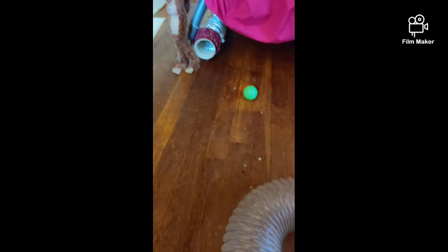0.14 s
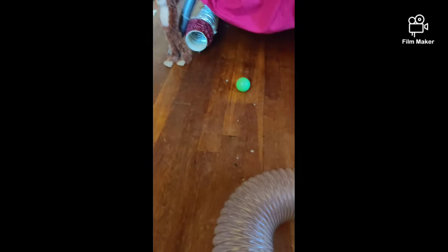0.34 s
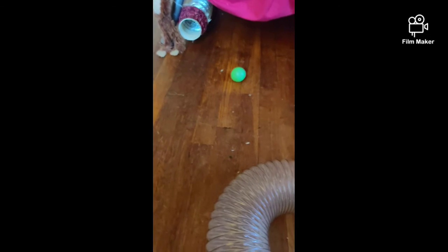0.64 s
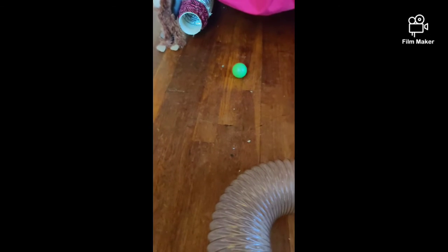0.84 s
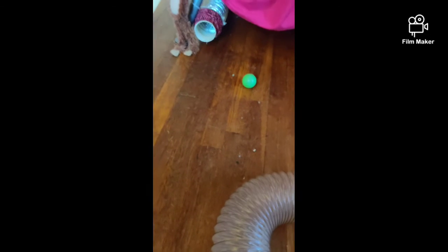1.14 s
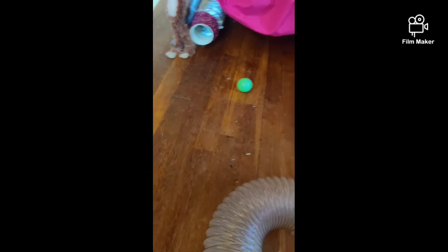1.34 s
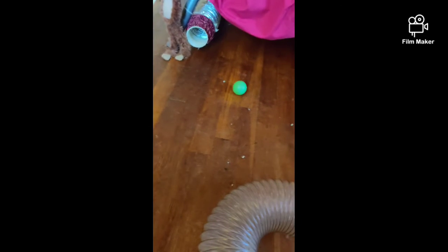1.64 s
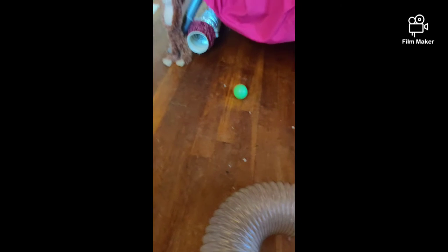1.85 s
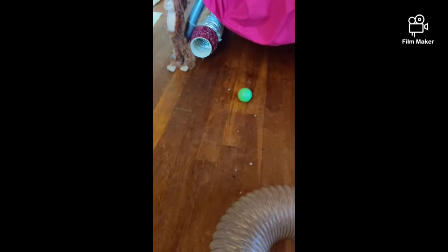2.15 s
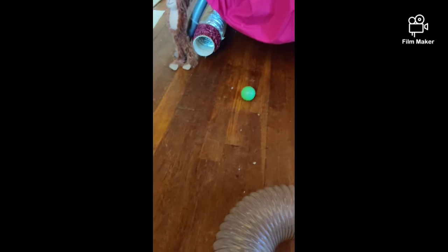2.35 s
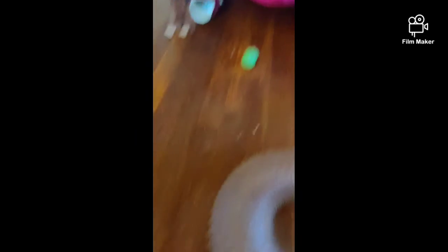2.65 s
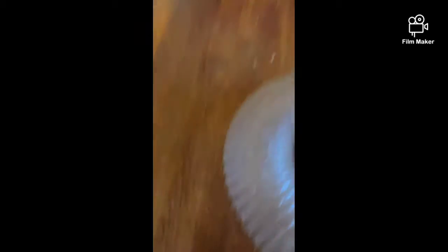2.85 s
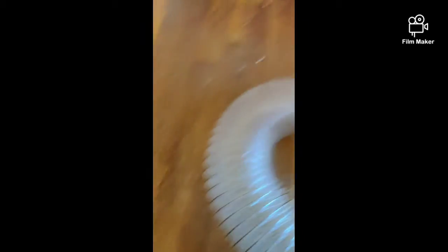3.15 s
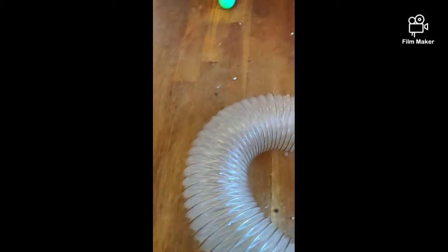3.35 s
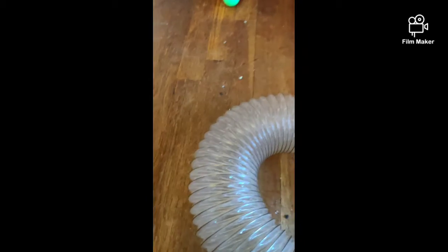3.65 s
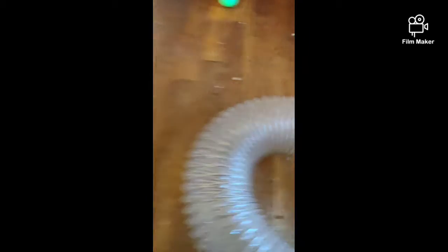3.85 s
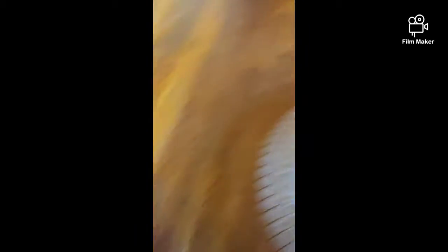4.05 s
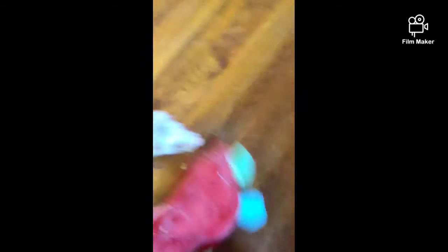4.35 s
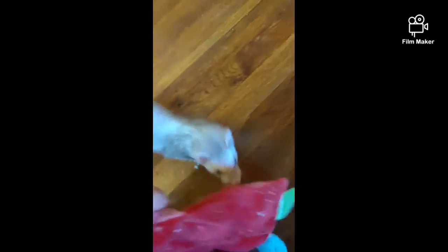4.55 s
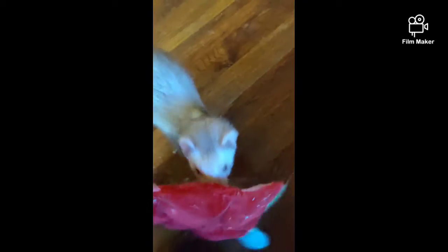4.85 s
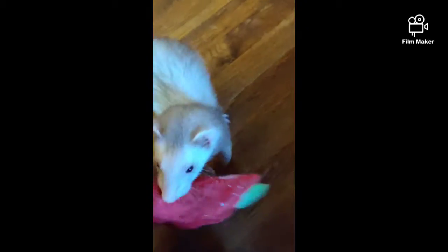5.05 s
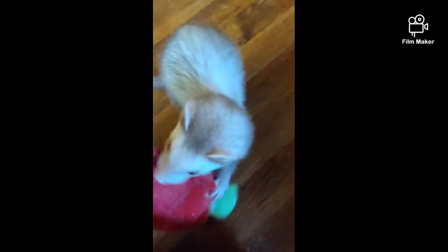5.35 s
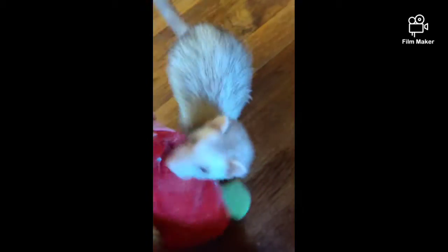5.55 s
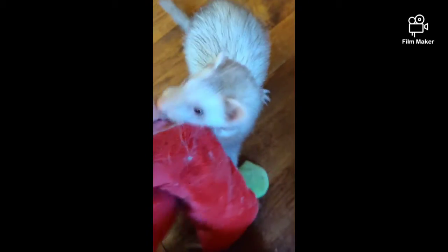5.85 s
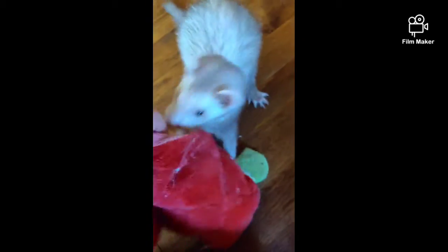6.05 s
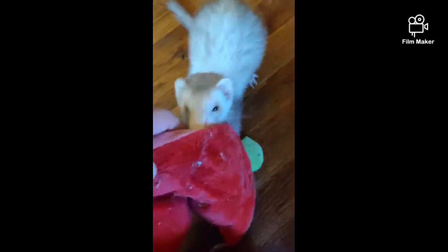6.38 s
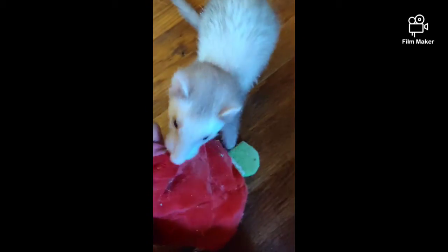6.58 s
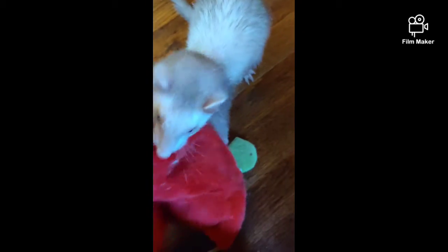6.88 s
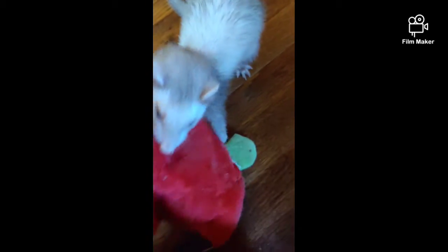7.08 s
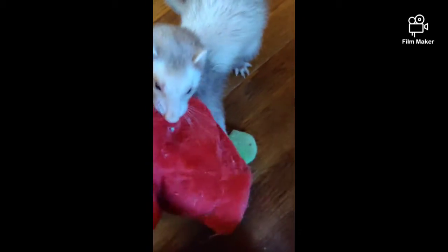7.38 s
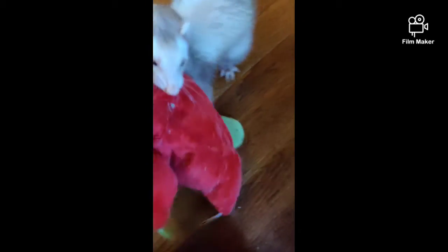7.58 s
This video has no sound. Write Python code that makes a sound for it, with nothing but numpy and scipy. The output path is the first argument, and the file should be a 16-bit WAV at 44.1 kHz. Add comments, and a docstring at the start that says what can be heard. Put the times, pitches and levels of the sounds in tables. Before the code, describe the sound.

Rapid, loud, nasal squeaks alternate high and slightly lower, about six a second, from a squeezed toy near the microphone. A one-second gap holds quiet room air, a soft low thump of handling and a few dull taps. The squeaks then return a little slower, short room reflections trailing them, while brushed fabric and soft, breathy ferret clucks lie far beneath. The squeaking carries on right to the end.

```python
"""Bright squeaks alternate with lower, duller ones: a hand pumps a squeaky plush toy close to a hand-held phone.
Each squeeze blows air out through a pulsing reed; each release sucks it back; body, hand and floor colour both.
A small room adds a decaying noise tail; under it lie filtered-noise room air, far bass and hand rumble.
Noise makes small taps and plush rustle; later a ferret clucks softly in short sagging two-harmonic tones."""
import sys
import numpy as np
from scipy import signal
from scipy.fft import rfft, irfft, next_fast_len
from scipy.io import wavfile
from scipy.ndimage import uniform_filter1d, map_coordinates

SR = 44100
rng = np.random.default_rng(int(sys.argv[2]) if len(sys.argv) > 2 else 0)


def digitize_waveform(pressure):
    """Quantize a signal to 16-bit integers and store it at the path in sys.argv[1].

    Rows of a 2-D input are taken as channels; values are limited to [-1, 1].
    """
    field = np.atleast_2d(pressure).T
    bounded = np.clip(field, -1, 1)
    quanta = np.round(bounded * 32767).astype(np.int16)
    wavfile.write(sys.argv[1], SR, quanta)


def how_loud(loudness_db):
    """Turn decibels into a plain amplitude multiplier (0 dB gives 1, 20 dB gives 10)."""
    steps = np.asarray(loudness_db, float) / 20
    return 10 ** steps


N = 340452
LEAD = SR // 4  # samples kept before the first moment
START = .008  # s into each squeak's sound at which the reed starts to swing

# Squeezes: start_s, length_s, middle_reed_hz, level_db, treble_tilt_db_per_octave
SQUEEZES = [(-0.115, 0.046, 1165, -11, -1.5), (0.254, .075, 1201, -9.5, 0.96),
            (.579, 0.065, 1188, -11, 1.4), (.911, 0.076, 1227, -10.5, 0.5),
            (1.2123, 0.058, 1162, -9.5, 1.8), (1.5082, .073, 1148, -10, 2.3), (1.813, .069, 1144, -9.5, 3),
            (2.141, 0.08, 1176, -9.5, 1.5), (2.465, .068, 1166, -9.5, 1.95), (2.745, .06, 1182, -10, 1.6),
            (4.0038, 0.075, 1224, -10, 0.5), (4.3906, .067, 1222, -9.5, 1.56),
            (4.7392, 0.075, 1197, -14, 0), (5.1023, 0.069, 1221, -10, 2), (5.439, 0.064, 1205, -10, 1.66),
            (5.7839, 0.065, 1218, -10, -0.5), (6.1806, 0.069, 1215, -10, -0.75),
            (6.6371, 0.079, 1192, -9.5, 0.3), (7.0594, .079, 1184, -8, -0.54),
            (7.477, 0.082, 1128, -9, -0.8)]
# Releases: start_s, length_s, highest_reed_hz (nominal), level_db, treble_tilt_db_per_octave
RELEASES = [(0.06, 0.095, 919, -15, 2), (0.4203, 0.089, 923, -13.5, 1.3), (0.7278, 0.088, 951, -14.5, 1.1),
            (1.0691, 0.081, 926.5, -14, 2), (1.3512, 0.076, 961, -13, 2.5),
            (1.6557, 0.075, 953.3, -13.5, 2), (1.9739, 0.086, 954, -13.5, 2), (2.316, .08, 919, -14.5, 2.2),
            (2.6308, 0.065, 923, -14.5, 2.1), (2.9164, 0.089, 903.5, -15, 0.6),
            (4.2004, 0.085, 917.6, -14.5, 1), (4.5602, 0.087, 926, -13, 0.9),
            (4.901, 0.091, 928.7, -13, 1.5), (5.2686, 0.076, 912.6, -13.5, 1.5),
            (5.6, 0.075, 906, -15, 0.4), (5.9565, 0.087, 926.3, -12, 0.5),
            (6.3637, 0.11, 932.6, -12.5, 1.5), (6.837, 0.099, 913, -13, 0.54),
            (7.252, 0.087, 911, -11, 0.1), (7.6837, 0.053, 910, -13, 0)]
# Moments in a squeak: share_of_length
STAGES = (0, .2, .5, .78, 1)
# Course at the STAGES: usual_reed_hz, share of this squeak's pitch offset that shows, level_db
SQUEEZE_COURSE = [(1086.5, .1, 1), (1144, 0.34, 0), (1184.9, 1, -0.16), (1116.3, 0.79, -2.5),
                  (1023.7, 0.36, -10)]
RELEASE_COURSE = [(894, 0.69, -1), (923, 0.78, -0.5), (910.4, .8, 0.3), (884.2, 0.35, -3.5),
                  (842.4, 0.12, -7)]
# Squeaker body, one gain per harmonic before the treble tilt: level_db
SQUEEZE_HARMONICS = [-3.5, -2.5, -6.5, -0.04, -4.5, -0.43, -2.45, -14.5, -14.5, -18.5, -14.5, -16.5]
RELEASE_HARMONICS = [1.5, -1.7, -1.24, -9.5, -6, -9, -24.5, -4, -8, -12.5, -20, -16.5, -30, -21.5, -19.5,
                     -24.5]
# How early the hand's pressure peaks: time_s, share_of_squeak
HURRY = [(0, 0), (.6, 0.11), (1.0, -0.023), (1.3, 0.13), (2.0, 0.14), (2.4, 0.019), (4, -.05), (6, -0.044),
         (7.7, 0.028)]
# Where the toy is held: time_s, left_lag_ms, squeeze_left_over_right_db, release_left_over_right_db
PLACE = [(0, 0.28, -3, -4.5), (1.2, 0.25, 0, -2), (2.2, 0.26, -2.4, -3.5), (4.0, 0.27, -3, -2),
         (4.4, 0.031, -2, -3.5), (5.15, -0.0058, -4.5, -0.5), (5.7, -0.11, -6, -0.5),
         (6.0, -0.082, -2.9, -2.5), (7.7, -0.064, -4, -5)]
# The left port over the right: frequency_hz, level_db
PORTS = [(900, 0.6), (2000, 5.5), (2800, 0), (4500, 1.4), (6000, 0), (7500, -3), (9500, 2.5), (12000, 1.5),
         (15000, -1.5)]
# Bounce off the closing or opening hand: time_s, left_delay_ms, right_delay_ms, strength (0-1)
SQUEEZE_BOUNCE = [(.25, .45, 0.357, 0.3), (.7, .3, .18, .32), (1.2, 0.15, 0.058, 0.33),
                  (1.85, 0.13, 0.065, 0.4), (2.3, 0.1, .21, 0.39), (4.1, 0.12, .25, 0),
                  (4.6, .3, 0.14, 0.6), (5.8, 0.11, 0.095, 0.1), (6.2, .4, .28, 0.2), (6.65, .4, .13, 0.2),
                  (7.05, 0.3, .1, 0.51), (7.5, 0.29, 0.13, 0.29)]
RELEASE_BOUNCE = [(.4, 0.087, .15, 0.34), (.73, .45, .2, .35), (1.07, .06, .15, .46), (1.35, .45, .17, 0.3),
                  (2.0, .45, .17, 0.35), (2.3, 0.074, .16, 0.48), (4.4, .1, 0.16, .5),
                  (5.5, 0.095, 0.13, 0.33), (5.95, 0.1, 0.29, 0.26), (7.7, 0.055, 0.286, 0.32)]
# Hollow between hand and plush, coloured towards the right port: time_s, level_db
HOLLOW = [(5.8, 2), (6.4, -4), (6.9, 8), (7.7, 8)]
# Room decay: frequency_hz, t60_s
ROOM_DECAY = [(500, 0.3), (2000, 0.32), (6000, 0.37), (15000, 0.28)]
# Room share, less as the toy comes nearer: time_s, level_db
ROOM_SHARE = [(0, -9.5), (3, -10), (4, -9.5), (5.5, -12), (7.7, -14.5)]
# Hand rumble before its unsteadiness and port balance: time_s, level_db
HANDLING = [(0.1, -43), (2.31, -41.5), (2.9, -36.5), (3.15, -26.5), (3.38, -42), (7.6, -42)]
# Rumble spectrum: frequency_hz, level_db per Hz
RUMBLE = [(2, -17), (6, 0.5), (15, -1), (30, -22.5), (60, -24), (120, -69)]
# Quiet room spectrum: frequency_hz, level_db per Hz
AIR = [(50, -25), (90, -6.5), (200, -17), (400, -15), (1000, -23.5), (3000, -28.5), (8000, -35),
       (15800, -49)]
# Far bass spectrum: frequency_hz, level_db per Hz
FAR_BASS = [(60, -18.5), (120, -3.5), (250, -4.0), (600, -32.5)]
# Plush rustle before its flutter: time_s, level_db
RUSTLE = [(3.0, -64.5), (3.4, -69.5), (3.75, -82.5), (3.95, -61), (5.3, -55.5), (5.9, -52.5), (6.04, -38),
          (6.16, -38.5), (6.3, -53), (6.52, -43), (6.75, -53), (7.05, -45), (7.45, -59.5), (7.6, -62.5)]
# Plush spectrum: frequency_hz, level_db per Hz
PLUSH = [(100, -22), (200, -3), (500, 0), (1300, -7), (4600, -7), (10000, -8), (15800, -10)]
# Small taps: start_s, level_db before a 1 dB lift, treble_db against the dull part
TAPS = [(3.089, -47, -18), (3.317, -53.5, -19), (3.528, -72, -14.5), (3.949, -58.5, -7)]
# Ferret clucks: start_s, level_db before a 3.5 dB trim and wobble, throat_hz before it sags
CLUCKS = [(5.423, -45, 366), (5.668, -37, 237.6), (6.007, -38.5, 427), (6.425, -45, 387),
          (6.502, -44.5, 312), (6.911, -46.5, 432), (7.038, -43, 226), (7.206, -37, 304.6),
          (7.307, -37, 387), (7.411, -39, 309), (7.509, -38.5, 334), (7.672, -42, 231)]


def unit(x):
    """Scale a sound to rms 1."""
    return x / np.sqrt(np.mean(x ** 2) + 1e-20)


def along(points, hz):
    """Read (frequency_hz, value) points on a log axis."""
    f, v = np.transpose(points)
    return np.interp(np.log(hz + 1), np.log(f + 1), v)


def at(rows, s):
    """The columns after the time, read at s seconds."""
    times, *cols = np.transpose(rows)
    return [np.interp(s, times, c) for c in cols]


def curves(rows):
    """One value per sample for each column after the time."""
    return at(rows, np.arange(N) / SR)


def wobble(rate, n=N):
    """A smooth random curve, rate knots a second."""
    return map_coordinates(rng.standard_normal(int(n * rate / SR) + 4), [np.arange(n) * rate / SR])


def noise(spectrum, channels):
    """Coloured noise of rms 1."""
    m = next_fast_len(N)
    gain = how_loud(along(spectrum, np.fft.rfftfreq(m, 1 / SR)))
    white = rng.standard_normal((channels, m))
    return unit(irfft(rfft(white) * gain, m)[:, :N])


def causal(gain):
    """The minimum-phase response with this gain."""
    c = irfft(np.log(gain))
    half = len(c) // 2
    c[1:half] *= 2
    c[half + 1:] = 0
    return np.exp(rfft(c))


def add(track, sound, s):
    """Mix a sound in at s seconds; the track starts LEAD samples early."""
    part = track[..., round(s * SR) + LEAD:][..., :sound.shape[-1]]
    part += sound[..., :part.shape[-1]]


def reed(length, early, hz, db, rise, fall, scoop, droop, jitter, breath, soften=0.15):
    """One pulse per reed closure plus gated air noise: steady, then shaped by swing and hand pressure."""
    share = np.array(STAGES)
    s = length * (share - 2 * early * share * (1 - share))
    t = np.arange(round((length + .05) * SR)) / SR - START
    after = np.maximum(t - length, 0)
    # the reed swings up, and dies when the air runs out
    swing = np.exp(-after / fall) / (1 + np.exp(-t / rise))
    pitch = uniform_filter1d(np.interp(t, s, hz), size=600)
    pitch = pitch * np.exp(-droop * after) * (1 - scoop / (1 + np.exp(t / rise)))
    phase = 2 * np.pi * np.cumsum(pitch * (1 + jitter * wobble(400, len(t)))) / SR
    k = np.arange(1, int(16500 / max(hz)) + 1)[:, None]  # harmonic numbers
    harmonics = np.cos(k * phase)
    hiss = breath * (1 + np.cos(phase)) * np.diff(rng.standard_normal(len(t) + 1))
    soft = swing ** (1 + soften * (k - 1))  # a small swing closes gently: few overtones
    steady = harmonics.sum(0) + hiss
    shaped = how_loud(np.interp(t, s, db)) * ((soft * harmonics).sum(0) + swing * hiss)
    return steady, shaped


def path_to_ports(hz, s, lag_ms, pan_db, bounces):
    """Travel to the two ports: level and lag between them, a hand bounce, floor echoes and the hollow."""
    def late(ms):
        return np.exp(-2j * np.pi * hz * ms / 1000)

    side = np.array([[.5], [-.5]])
    *delays, strength = at(bounces, s)
    path = how_loud(side * (pan_db + along(PORTS, hz))) * late(1 + side * lag_ms)
    path = path * (1 + strength * late(np.c_[delays]))
    # three treble echoes off boards and toys: scattered around 4.5 ms, low edge 5550 Hz
    echoes = sum(late(ms) for ms in 4.5 * rng.uniform(0.55, 1.4, (3, 2, 1)))
    path = path * (1 + how_loud(-10.5) * echoes / (1 + (5550 / (hz + 1)) ** 4))
    path[1] *= how_loud(at(HOLLOW, s)[0] * np.exp(-((hz - 2750) / 500) ** 2))
    return path


def squeaks(rows, course, usual_hz, harmonics_db, body_hz, bounces, flow, pan_column, **reed_settings):
    """Drive the squeaker's body with the reed and carry each squeak to both ports."""
    size = 8192
    near, hz = np.zeros((2, N + SR)), np.fft.rfftfreq(size, 1 / SR)
    small = 1 / (1 + (550 / (hz + 1)) ** 6)  # so small a squeaker radiates no bass
    course_hz, shows, course_db = np.transpose(course)
    body_db = np.interp(hz, body_hz * np.arange(1, len(harmonics_db) + 1), harmonics_db)
    for s, length, squeak_hz, level_db, tilt_db in rows:
        reed_hz = course_hz + shows * (squeak_hz - usual_hz)
        steady, shaped = reed(length, at(HURRY, s)[0], reed_hz, level_db + course_db, **reed_settings)
        tilt = tilt_db * np.log2(np.maximum(hz, 500) / 3000)
        body = flow * small * causal(how_loud(body_db + tilt))
        place = at(PLACE, s)
        path = path_to_ports(hz, s, place[0], place[pan_column], bounces)
        steady_out, sound = irfft(rfft([[steady], [shaped]], size) * body * path)
        # the steady reed sets the loudness, so the pressure course stays audible
        add(near, sound / np.std(steady_out[:, :len(shaped)]), s - START - .0015)
    return near


def squeezes():
    """Air runs out through the reed: high and bright, with a quick swing and more breath."""
    return squeaks(SQUEEZES, SQUEEZE_COURSE, 1185, SQUEEZE_HARMONICS, 1179.5, SQUEEZE_BOUNCE,
                   flow=-1j, pan_column=1,
                   rise=.00055, fall=.006,  # s
                   scoop=.1, droop=5.6,  # share of pitch at the onset; share per s as the air runs out
                   jitter=.0015, breath=.085)


def releases():
    """Air is sucked back, so the pressure steps the other way: lower and duller, with a slower swing."""
    return squeaks(RELEASES, RELEASE_COURSE, 923, RELEASE_HARMONICS, 923.4, RELEASE_BOUNCE,
                   flow=1j, pan_column=2,
                   rise=.001, fall=0.0067,  # s
                   scoop=.17, droop=13,  # share of pitch at the onset; share per s as the air runs out
                   jitter=.0008, breath=.03)


def room(x, block=SR // 6):
    """The walls' answer; hand and phone move, so every squeak or so gets a new tail of decaying noise."""
    out = np.zeros_like(x)
    for start in range(0, N + LEAD, block):
        hz, t, z = signal.stft(rng.standard_normal((2, SR // 2)), SR, nperseg=256)
        decay = how_loud(-60 * t / along(ROOM_DECAY, hz)[:, None])
        tail = signal.istft(z * decay, SR, nperseg=256)[1]
        tail = tail / np.linalg.norm(tail[0])
        # each side answers the opposite one
        answer = signal.fftconvolve(x[::-1, start:start + block], tail, axes=1)
        add(out, answer, (start - LEAD) / SR + .004)
    return out


def hand_rumble():
    """Slow low noise from the holding hand, which sits by the right port."""
    level_db = curves(HANDLING)[0] + np.c_[[-9, 4]] + 5.1 * wobble(6.7)
    return how_loud(level_db) * unit(0.55 * noise(RUMBLE, channels=1) + noise(RUMBLE, channels=2))


def room_air():
    """Quiet wavering air noise, separate at each port, over far bass alike at both."""
    far_bass = how_loud(-64.5) * noise(FAR_BASS, channels=1)
    air_db = -58.5 + 0.83 * wobble(2.9) + 1.9 * wobble(12)
    return far_bass + how_loud(air_db) * noise(AIR, channels=2)


def plush_rustle():
    """Coloured noise with a quick grainy flutter, partly shared by both ports."""
    level_db = curves(RUSTLE)[0] + 1.2 * wobble(15) + 2.5 * wobble(300)
    return how_loud(level_db) * unit(noise(PLUSH, channels=1) + noise(PLUSH, channels=2))


def taps():
    """Dull little contacts: decaying smoothed noise with a shorter bright edge."""
    out, t = np.zeros(N + SR), np.arange(SR // 20) / SR
    for s, db, treble_db in TAPS:
        dull = unit(uniform_filter1d(rng.standard_normal(len(t)), size=20)) * how_loud(-60 * t / 0.11)
        edge = how_loud(treble_db - 60 * t / .008) * rng.standard_normal(len(t))
        add(out, how_loud(db + 1.0) * (dull + edge), s)
    return out


def ferret(length=0.049):
    """Soft breathy clucks: a short sagging throat tone, unsteady, with a puff of low noise."""
    voice, t = np.zeros(N + SR), np.arange(SR // 8) / SR
    for s, db, throat_hz in CLUCKS:
        pitch = throat_hz * np.exp(-3 * t) * (1 + .12 * wobble(134, len(t)))
        phase = 2 * np.pi * np.cumsum(pitch) / SR
        tone = np.sin(phase) + 0.74 * np.sin(2 * phase)
        puff = np.diff(rng.standard_normal(len(t) + 1))
        for _ in range(2):
            puff = uniform_filter1d(puff, size=60)
        swell = np.sin(np.pi * np.minimum(t / length, 1)) ** 2
        level = how_loud(db - 3.5 + 1.6 * wobble(77.0, len(t)))
        add(voice, level * (tone + 0.78 * unit(puff)) * swell, s - .005)
    return voice


def scene():
    """Toy, taps and ferret sound in the room; rumble, air and rustle lie under them."""
    near = squeezes() + releases() + taps() + ferret()
    direct = near[:, LEAD:LEAD + N]
    echo = how_loud(curves(ROOM_SHARE)[0]) * room(near)[:, LEAD:LEAD + N]
    return direct + echo + hand_rumble() + room_air() + plush_rustle()


def top_cut(x):
    """Nothing passes above the cut-off."""
    return signal.sosfilt(signal.butter(12, 16830, fs=SR, output="sos"), x)


def record(dry):
    """The phone rounds off the highest peaks with a smooth saturation curve."""
    top = .85  # full scale is 1
    mix = dry / (1 + np.abs(dry / top) ** 6) ** (1 / 6)
    return top_cut(mix)


dry = scene()
out = record(dry)
digitize_waveform(out)
```